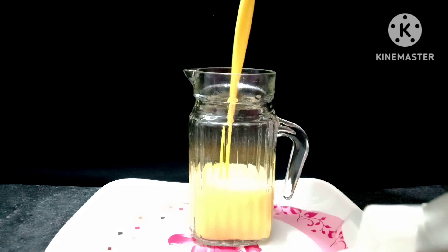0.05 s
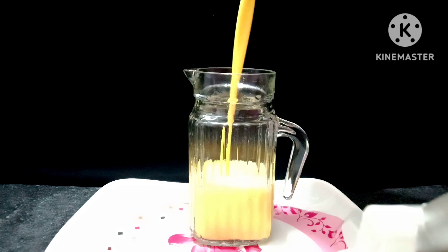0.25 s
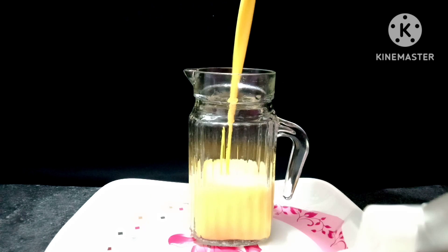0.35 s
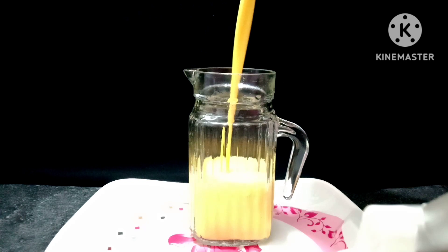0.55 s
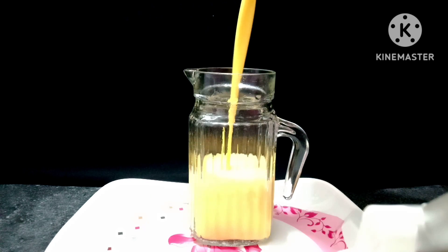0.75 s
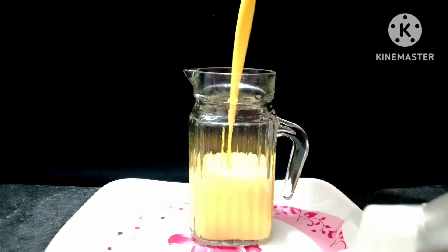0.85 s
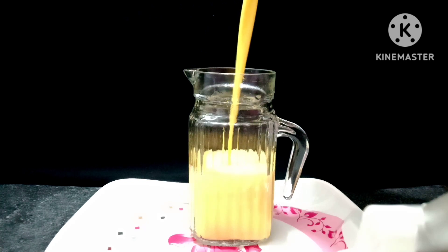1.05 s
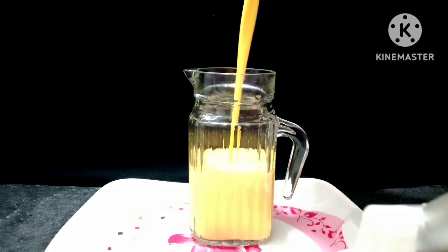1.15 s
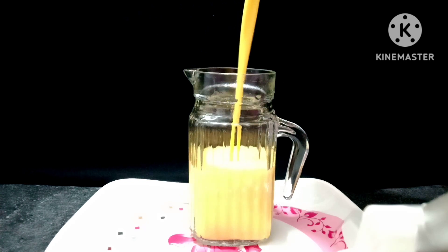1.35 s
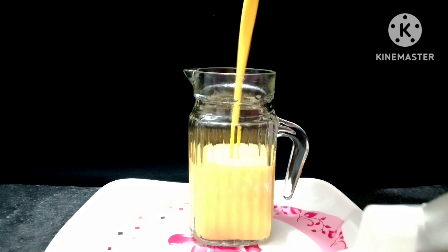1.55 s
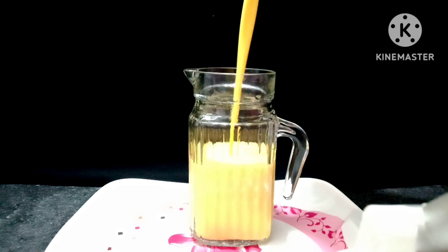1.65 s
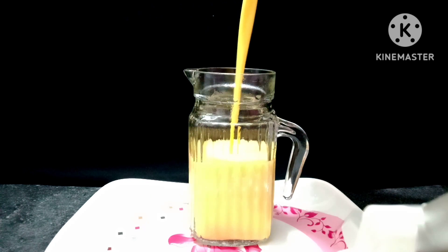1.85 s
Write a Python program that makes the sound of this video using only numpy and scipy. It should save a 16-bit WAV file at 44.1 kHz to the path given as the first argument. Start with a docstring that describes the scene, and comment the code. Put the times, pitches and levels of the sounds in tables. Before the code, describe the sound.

A thick liquid pours into a glass jug, glugging, popping and fizzing unevenly in a quiet kitchen

```python
"""A faint plop opens over a quiet kitchen, then a thick blended drink pours into a glass jug, heard close by.
The stream folds in air: big bubbles plop, gulps glide, films snap, lumps splash, small bubbles gurgle and fizz.
The air pocket around the stream rings at a gliding pitch, as a resonance kept alive by random kicks.
Two resonances of the jug's air colour the drink; shaped noise rumbles in the tray, with one deep knock."""
import sys
import numpy as np
from scipy import signal
from scipy.fft import rfft, irfft
from scipy.io import wavfile

SR = 44100
rng = np.random.default_rng(int(sys.argv[2]) if len(sys.argv) > 2 else 0)


def wrap_up_sound(samples):
    """Save the sound to the file named by the first command line argument, as 16-bit audio."""
    columns = np.atleast_2d(samples).T
    # keep every value between -1 and 1, then stretch to whole-number steps
    tamed = np.clip(columns, -1, 1)
    steps = np.round(tamed * 32767).astype(np.int16)
    wavfile.write(sys.argv[1], SR, steps)


N = 83790   # length [samples]
T = np.arange(N) / SR   # time [s]

# Levels of the drink's layers are set before the jug's air colours them.
# big bubbles ringing at the surface: (time [s], settled pitch [Hz], level [dB], decay by 60 dB [s])
BUBBLES = [(0, 1533, -24.5, 0.079), (0.1922, 2030, -24, 0.021), (.2461, 3610, -14.5, 0.027),
           (.2462, 1666, -20.5, 0.048), (.2465, 757, -24, 0.11), (0.2623, 1160, -13.5, 0.063),
           (0.2834, 3540, -14, 0.016), (0.2987, 4100, -10.5, 0.0043), (0.3279, 3430, -0.5, 0.02),
           (.319, 798, -25, 0.071), (.328, 746, -8.5, 0.027), (.343, 672, -13, 0.061),
           (.369, 705, -15.5, 0.054), (.496, 951, -11.5, 0.051), (0.5072, 6670, -14.5, 0.017),
           (0.5368, 2955, -24, 0.033), (0.6175, 2600, -20, 0.034), (0.6449, 6640, -14.5, 0.0032),
           (.699, 1138, -21, 0.059), (.7784, 3580, -3, 0.0075), (0.7787, 5130, -6.5, 0.0074),
           (0.783, 1450, -19, 0.03), (0.9413, 1540, -18.5, 0.032), (1.146, 1003, -11.5, 0.061),
           (1.146, 1366, -17, 0.031), (1.4774, 3300, -16, 0.011), (1.5478, 1070, -21, 0.021),
           (1.61, 695, -29.5, 0.19), (1.627, 1089, -22.5, 0.061)]
BUBBLE_SAG, BUBBLE_RISE = 0.046, 0.15   # sharpness at the start, climb over the decay [octaves]
SWELL_CYCLES = .35   # time constant of the onset [cycles]

# gulps that swell softly and glide: (time [s], starting pitch [Hz], level [dB], length [s], rise [octaves])
GULPS = [(0.2863, 1510, -13, 0.0083, 1.4), (0.564, 923, -24.5, 0.049, 1.31),
         (0.672, 3020, -32.5, 0.0086, 3), (.728, 1407, -32, 0.027, 0.9), (0.927, 7420, -8.5, 0.002, 0.75),
         (1.037, 1231, -20, 0.032, -0.58), (1.066, 992, -17.5, 0.0092, -0.31), (1.71, 707, -38, 0.09, 0.34)]

# air pocket around the stream: (time [s], pitch [Hz])
POCKET = [(.35, 746), (.41, 930), (.565, 927), (.62, 1774), (.71, 1104), (.76, 1824), (.87, 1355),
          (1.075, 941), (1.21, 1037), (1.32, 1276), (1.4, 958), (1.9, 1181)]
POCKET_WIDTH_HZ, POCKET_KICKS_PER_S = 60, 130
POCKET_DB, POCKET_DB_PER_OCTAVE = 0.5, -5.5   # level relative to the churning, tilt with pitch
OVERTONE_RATIO, OVERTONE_DB = 1.5, -9   # second mode: pitch ratio, level relative to the churning

# vigour of the churning, shared by pocket and gurgle: (time [s], level [dB])
CHURN = [(.21, -70), (.26, -42), (.385, -46.5), (.415, -87), (.48, -75), (.54, -39.5), (.65, -51.5),
         (.73, -46.5), (.8, -45.5), (.98, -47), (1.04, -33.5), (1.1, -41), (1.17, -37), (1.29, -51),
         (1.33, -41), (1.54, -50.5), (1.63, -37.5), (1.69, -53.5), (1.76, -45.5)]

# pitch range and colour of the gurgle's bubbles: (pitch [Hz], relative level [dB])
GURGLE_COLOUR = [(560, -9.5), (1400, 1), (2400, 3), (3400, 8.5), (6000, -4.5)]
GURGLE_DB = -0.5   # relative to the churning
GURGLE_PER_S, GURGLE_CYCLES, GURGLE_SPREAD_DB = 1000, 28, 4   # bubble rate, typical length, unevenness

# fine crackle of the froth: (time [s], level [dB])
FIZZ = [(.2, -68), (.3, -41), (.41, -65.5), (.54, -36.5), (.6, -57), (.72, -45), (1.1, -44), (1.28, -56.5)]
# pitch range and colour of the froth's bubbles: (pitch [Hz], relative level [dB])
FIZZ_COLOUR = [(4000, 4), (15500, 12)]
FIZZ_PER_S, FIZZ_CYCLES, FIZZ_SPREAD_DB = 1000, 26, 6

# small bubbles of gurgle and fizz: bubbles per cluster, cluster span [s], greatest climb [octaves]
CLUSTER_COUNT, CLUSTER_S, SMALL_RISE = 4, .003, 1.0

# films that snap: (time [s], peak level [dB], centre of the resonance [Hz])
SNAPS = [(0.0989, -22.5, 6800), (0.1441, -25.5, 4250), (0.1897, -20, 8800), (0.2452, -10, 6100),
         (0.283, -14, 7700), (0.329, -2, 10100), (.429, -15.5, 11100), (.507, -1.5, 12600),
         (0.536, -9.5, 9600), (.543, -10.5, 8600), (0.7788, -7, 2280), (0.997, -10.5, 10800),
         (1.1249, -12, 13300), (1.251, -18, 15400)]
SNAP_T60_S, SNAP_WIDTH = 0.0014, 0.54   # decay of the noise burst; width as a share of the centre

# lumps that land with a splash: (time [s], peak level [dB], lowest bubble pitch [Hz])
SPLASHES = [(0.8838, -22.5, 2940), (1.0203, -19, 1212), (1.224, -26.5, 972), (1.394, -23.5, 922),
            (1.4563, -25.5, 1210), (1.489, -25, 930), (1.578, -23.5, 964), (1.595, -27.5, 1460)]
SPLASH_COUNT, SPLASH_S = 6, 0.0089   # bubbles per splash, longest delay
SPLASH_OCTAVES, SPLASH_CYCLES = 1.694, 22   # pitch span, average decay [cycles of each bubble]

# air in the jug, added on top of the drink: (resonance [Hz], level at its centre [dB])
JUG = [(1430, -5.5), (3050, 3)]
JUG_WIDTH_HZ = 70
WALLS_DB, WALLS_T60_S = -7, 0.025   # short reflections

# rumble of the tray under the stream: (time [s], level [dB])
RUMBLE = [(.23, -67), (.255, -31.5), (.35, -38.5), (.41, -48.5), (.95, -51), (1.15, -38), (1.23, -52.5)]
# colour of the rumble: (frequency [Hz], relative level [dB per Hz])
RUMBLE_COLOUR = [(90, -29), (130, 3), (200, -16.5), (280, -8), (480, -21), (700, -17)]
# a soft, deep knock through the table
THUD_S, THUD_HZ, THUD_DB, THUD_T60_S = .425, 40.4, -35, 0.74

# colour of the quiet kitchen: (frequency [Hz], relative level [dB per Hz])
FLOOR = [(35, 4), (200, 2), (700, -13), (3000, -28), (15000, -42)]
FLOOR_DB = -47
CUTOFF_HZ = 15800


def from_db(db):
    """Turns decibels into an amplitude factor."""
    return 10 ** (np.asarray(db) / 20)


def rms_one(x):
    """Scales a sound to rms 1."""
    return x / np.sqrt(np.mean(x ** 2) + 1e-20)


def in_time(rows):
    """Draws a two-column curve at every sample."""
    times, values = np.transpose(rows)
    return np.interp(T, times, values)


def at_hz(points, hz):
    """Reads a spectrum on a log-frequency axis."""
    table_hz, table_db = np.transpose(points)
    return np.interp(np.log(hz), np.log(table_hz), table_db)


def dying(t, t60):
    """An exponential decay that loses 60 dB in t60."""
    return np.exp(-np.log(1000) * t / t60)


def add(out, s, sound):
    """Mixes a sound in at time s, trimmed at the end of the scene."""
    i = int(np.clip(s * SR, 0, N - 1))
    out[i:i + len(sound)] += sound[:N - i]


def resonate(x, hz, width_hz):
    """A two-pole resonance with gain close to 1 at its centre."""
    r = np.exp(-np.pi * width_hz / SR)
    feed = np.array([1, 0, -1]) * (1 - r * r) / 2
    back = [1, -2 * r * np.cos(2 * np.pi * hz / SR), r * r]
    return signal.lfilter(feed, back, x + 1e-18)


def bubble(hz, t60):
    """A dying sine that starts a little sharp, settles, then climbs as the bubble opens."""
    t = T[:int(t60 * SR) + 2]
    pitch = hz * 2 ** (BUBBLE_SAG * dying(t, t60) + BUBBLE_RISE * (t / t60) ** 2)
    onset = 1 - np.exp(-t * hz / SWELL_CYCLES)
    return np.sin(2 * np.pi * np.cumsum(pitch) / SR) * onset * dying(t, t60)


def chirp(hz, length, rise):
    """A bubble that swells softly, fades more slowly and glides by rise octaves."""
    age = T[:int(length * SR)] / length
    pitch = np.minimum(hz * 2 ** (rise * age ** 2), SR / 2)
    swell = np.sin(np.pi * np.sqrt(age)) ** 2
    return np.sin(2 * np.pi * np.cumsum(pitch) / SR) * swell


def plops():
    """Trapped air rings as it meets the surface: big bubbles start sharply, gulps softly."""
    out = np.zeros(N)
    for s, hz, db, t60 in BUBBLES:
        add(out, s, from_db(db) * bubble(hz, t60))
    for s, hz, db, length, rise in GULPS:
        add(out, s, from_db(db) * chirp(hz, length, rise))
    return out


def pocket(ratio):
    """Random kicks keep one mode of the air pocket ringing as it glides; a large, low pocket is louder."""
    hz = in_time(POCKET)
    turn = np.exp(2j * np.pi * np.cumsum(ratio * hz) / SR)
    kicks = (rng.random(N) < POCKET_KICKS_PER_S / SR) * rng.choice([-1, 1], N)
    # the ringing is smoothed around zero frequency, then turned up to the gliding pitch
    r = np.exp(-np.pi * POCKET_WIDTH_HZ / SR)
    swing = signal.lfilter([1 - r], [1, -r], kicks / turn)
    swing = signal.sosfilt(signal.butter(2, 250, fs=SR, output="sos"), swing)
    evened = swing / np.sqrt(np.abs(swing) + 1e-12)   # halves the loudness swings in dB
    tilt = from_db(POCKET_DB_PER_OCTAVE * np.log2(hz))
    return rms_one(np.real(turn * evened) * tilt)


def swarm(per_s, colour, cycles, spread_db):
    """Clusters of small bubbles, a few much stronger, with varied pitches, lengths and glides; rms 1."""
    out = np.zeros(N)
    low, high = colour[0][0], colour[-1][0]
    cluster_total = int(per_s * N / SR / CLUSTER_COUNT)
    for when, size in rng.random((cluster_total, 2)):
        cluster_db = spread_db * min(-np.log(1 - size), 3)
        for delay, place, life, climb in rng.random((CLUSTER_COUNT, 4)):
            hz = low * (high / low) ** place
            length = cycles * np.exp(2 * life - 1) / hz
            ring = chirp(hz, length, SMALL_RISE * climb)
            ring = ring * dying(np.linspace(0, 1, len(ring)), 2)   # quick swell, long tail
            level = from_db(at_hz(colour, hz) + cluster_db)
            add(out, when * N / SR + CLUSTER_S * delay, level * ring)
    return rms_one(out)


def snaps():
    """A film tears: a very short noise burst in a broad resonance."""
    out = np.zeros(N)
    t = T[:SR // 50]
    noises = rng.standard_normal((len(SNAPS), len(t)))
    for (s, db, hz), noise in zip(SNAPS, noises):
        burst = resonate(noise * dying(t, SNAP_T60_S), hz, SNAP_WIDTH * hz)
        add(out, s, from_db(db) * burst / np.abs(burst).max())
    return out


def splashes():
    """A lump lands and throws off a handful of bubbles, spread upward from the lowest pitch."""
    out = np.zeros(N)
    for s, db, low in SPLASHES:
        burst = np.zeros(N)
        for k, (delay, place, life) in enumerate(rng.random((SPLASH_COUNT, 3))):
            hz = low * 2 ** (SPLASH_OCTAVES * (k + place) / SPLASH_COUNT)
            t60 = SPLASH_CYCLES * (.5 + life) / hz
            add(burst, s + SPLASH_S * delay ** 2, bubble(hz, t60))   # squaring crowds the start
        out += from_db(db) * burst / np.abs(burst).max()
    return out


def reflections(x, t60):
    """Dense dying echoes with unit energy, starting after 1 ms."""
    tail = rng.standard_normal(N) * dying(T, t60) * (T > .001)
    return signal.fftconvolve(x, tail / np.sqrt(np.sum(tail ** 2)))[:N]


def jug_air(drink):
    """The air in the jug resonates along with the drink."""
    return drink + sum(from_db(db) * resonate(drink, hz, JUG_WIDTH_HZ) for hz, db in JUG)


def coloured_noise(spectrum):
    """Noise with the given spectrum, rolled off beyond both ends; rms 1."""
    hz = np.maximum(np.arange(N // 2 + 1) * SR / N, 1)
    ends = 1 / (1 + (spectrum[0][0] / hz) ** 4) / (1 + (hz / spectrum[-1][0]) ** 8)
    shape = from_db(at_hz(spectrum, hz)) * ends
    return rms_one(irfft(rfft(rng.standard_normal(N)) * shape, N))


def tray_rumble():
    """The tray rumbles as low noise of varying level, with one slowly dying knock."""
    out = from_db(in_time(RUMBLE)) * coloured_noise(RUMBLE_COLOUR)
    add(out, THUD_S, from_db(THUD_DB) * bubble(THUD_HZ, THUD_T60_S))
    return out


def kitchen():
    """The quiet kitchen is a steady noise, strongest in the bass."""
    return from_db(FLOOR_DB) * coloured_noise(FLOOR)


def scene():
    """The drink in the jug, the tray beneath and the quiet kitchen around."""
    churn = from_db(in_time(CHURN))
    main_mode = from_db(POCKET_DB) * pocket(1)
    overtone = from_db(OVERTONE_DB) * pocket(OVERTONE_RATIO)
    ringing = churn * (main_mode + overtone)
    gurgle = swarm(GURGLE_PER_S, GURGLE_COLOUR, GURGLE_CYCLES, GURGLE_SPREAD_DB)
    gurgle = from_db(GURGLE_DB) * churn * gurgle
    fizz = from_db(in_time(FIZZ)) * swarm(FIZZ_PER_S, FIZZ_COLOUR, FIZZ_CYCLES, FIZZ_SPREAD_DB)
    small = snaps() + splashes() + gurgle + fizz
    walls = from_db(WALLS_DB) * reflections(small, WALLS_T60_S)
    drink = plops() + ringing + small + walls
    mix = jug_air(drink) + tray_rumble() + kitchen()
    return mix[None]   # one channel


def record(dry):
    """The top is cut steeply by an elliptic low-pass."""
    low_pass = signal.ellip(10, .2, 80, CUTOFF_HZ, fs=SR, output="sos")
    return signal.sosfilt(low_pass, dry)


dry = scene()
out = record(dry)
wrap_up_sound(out)
```